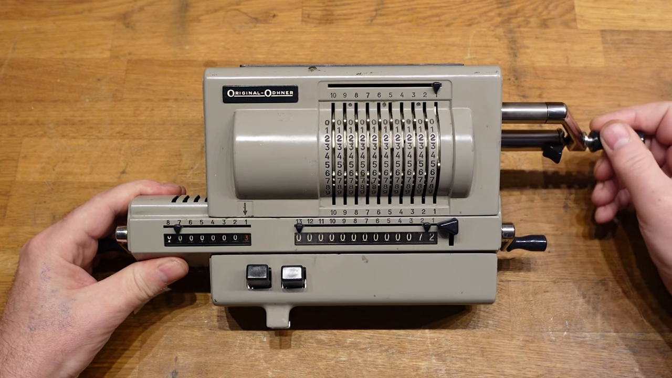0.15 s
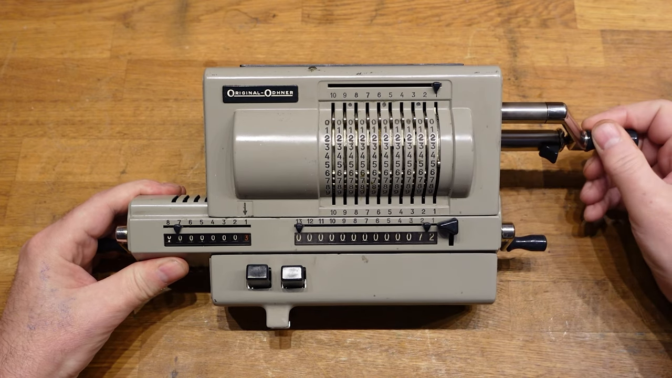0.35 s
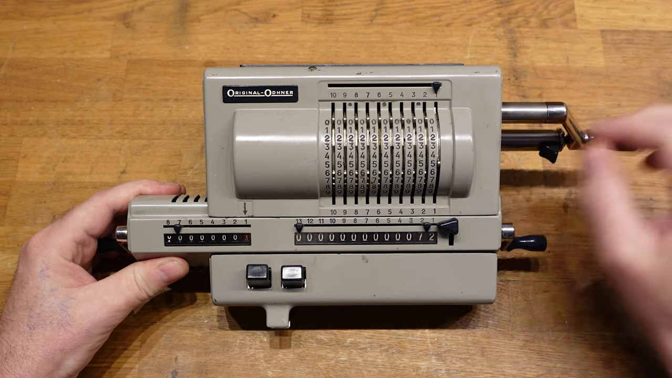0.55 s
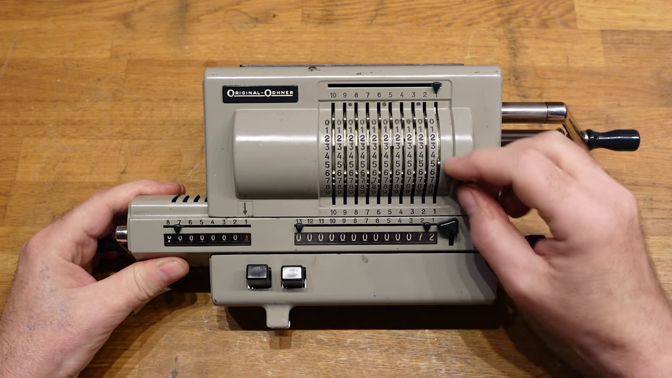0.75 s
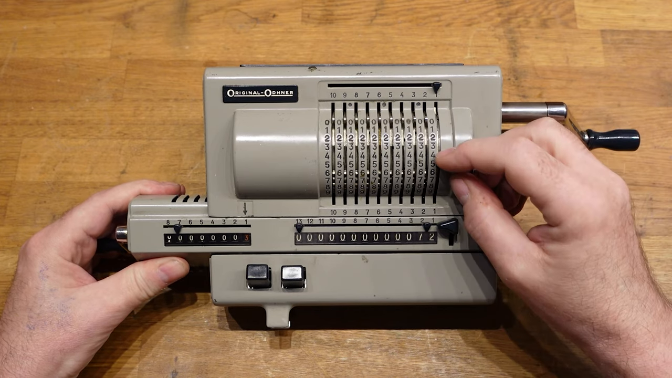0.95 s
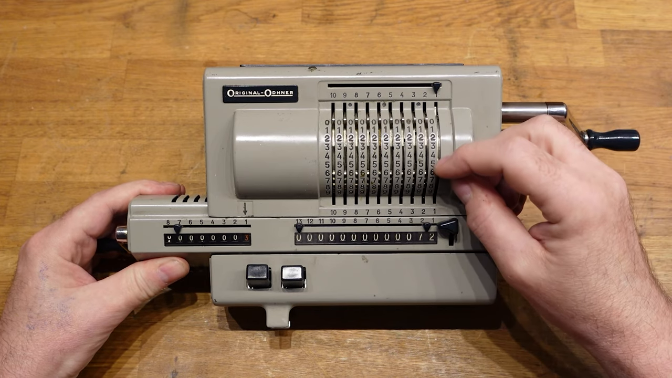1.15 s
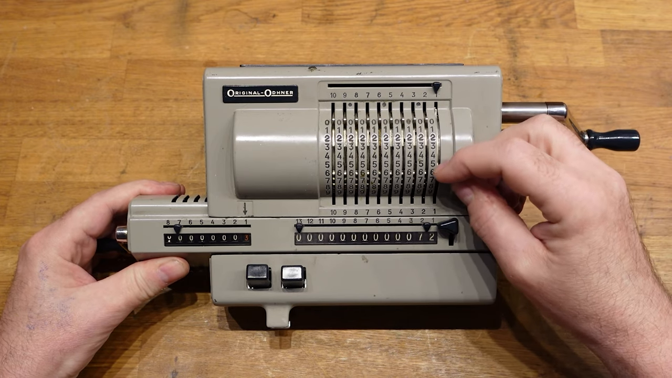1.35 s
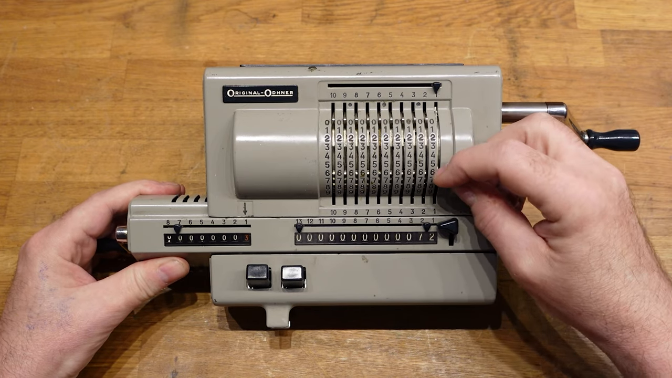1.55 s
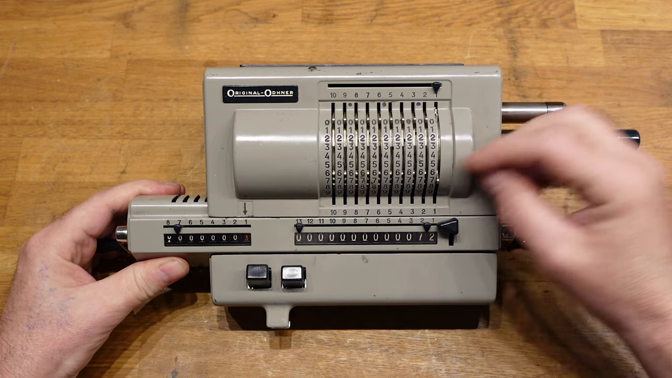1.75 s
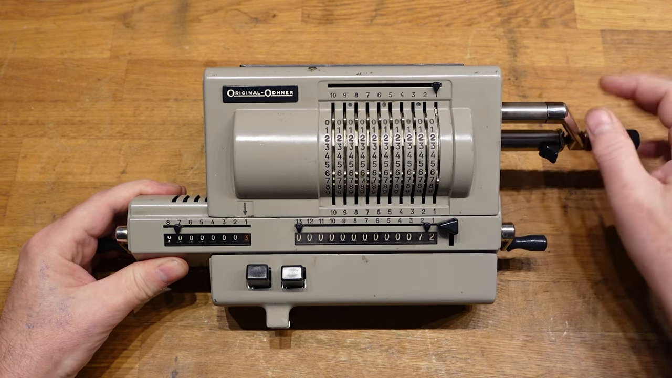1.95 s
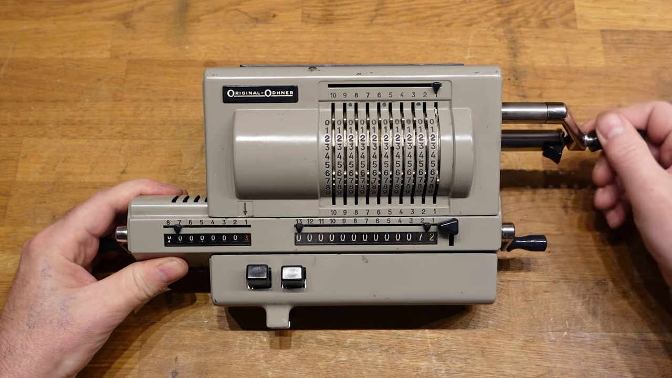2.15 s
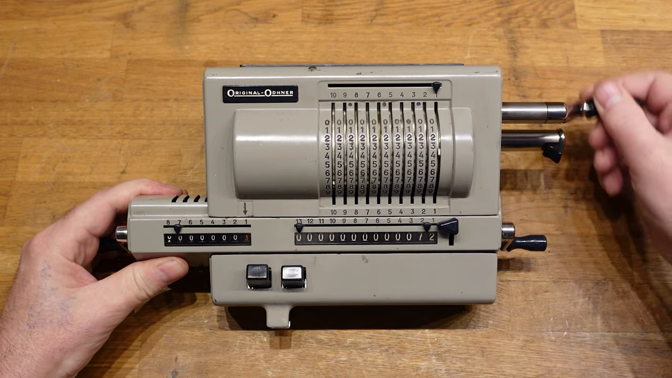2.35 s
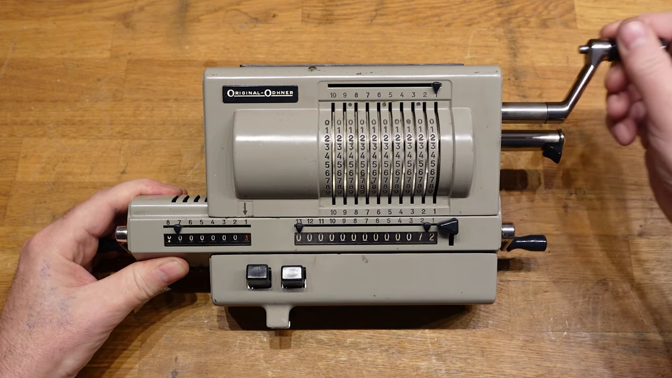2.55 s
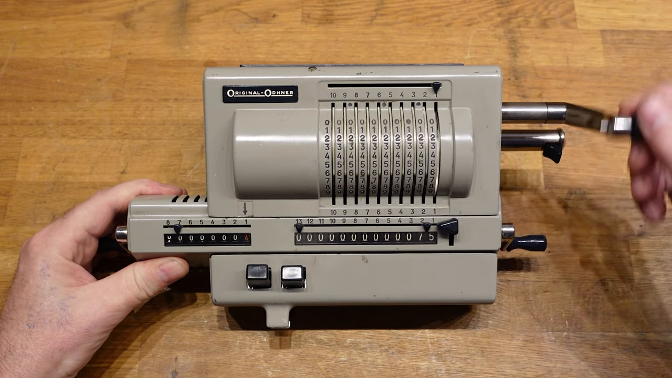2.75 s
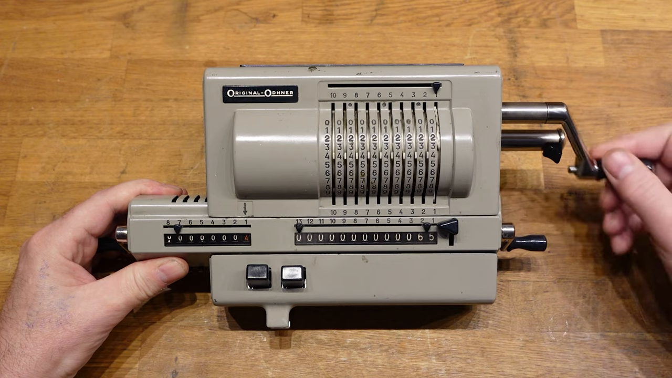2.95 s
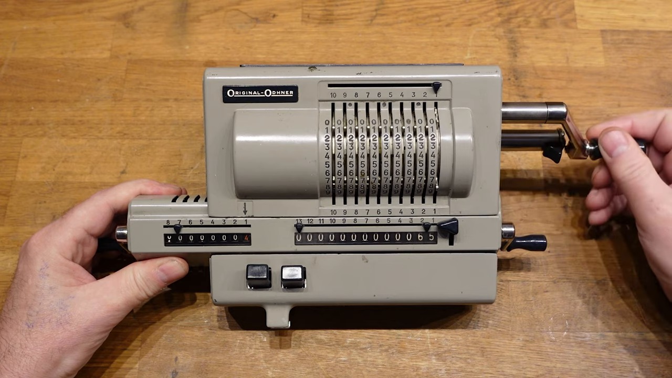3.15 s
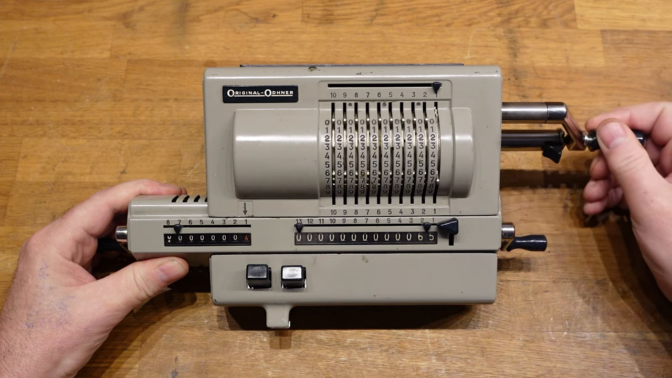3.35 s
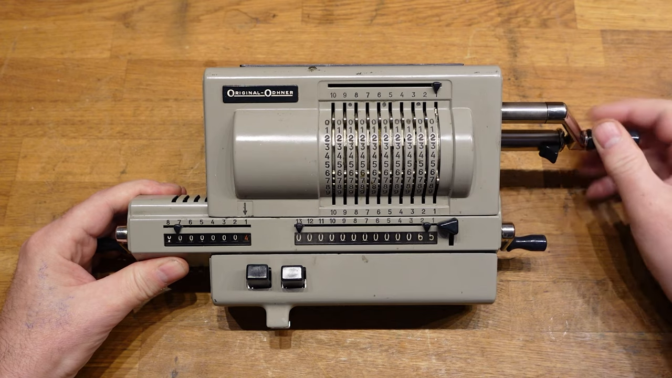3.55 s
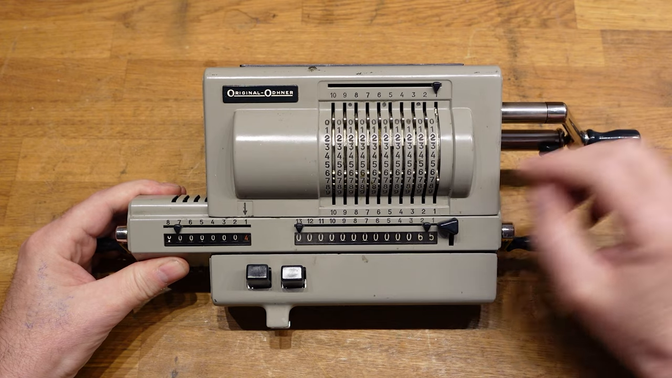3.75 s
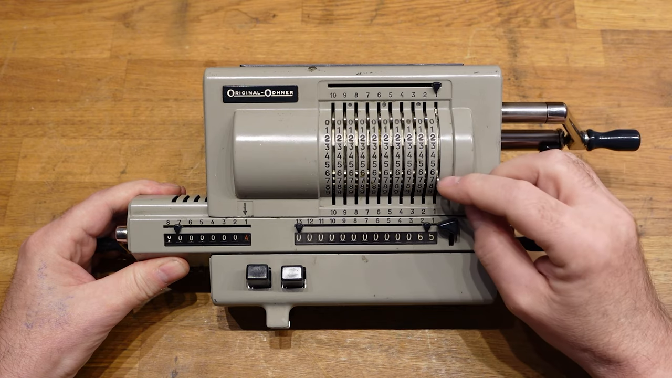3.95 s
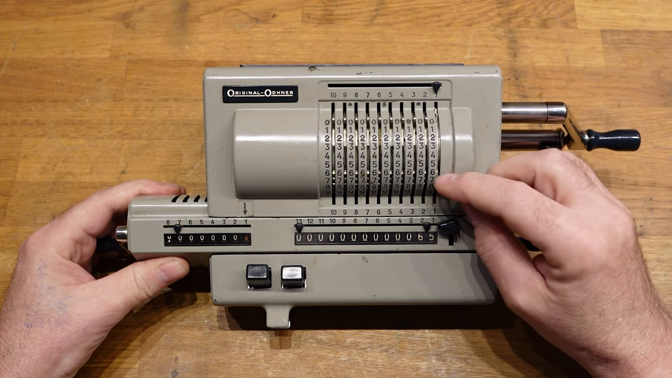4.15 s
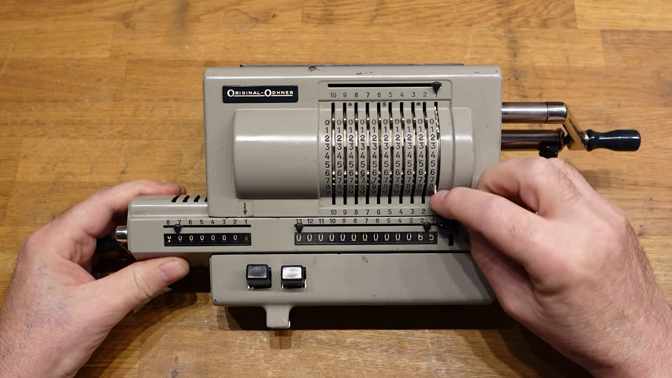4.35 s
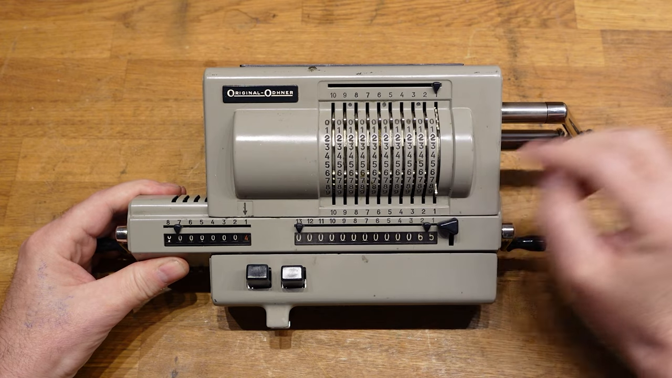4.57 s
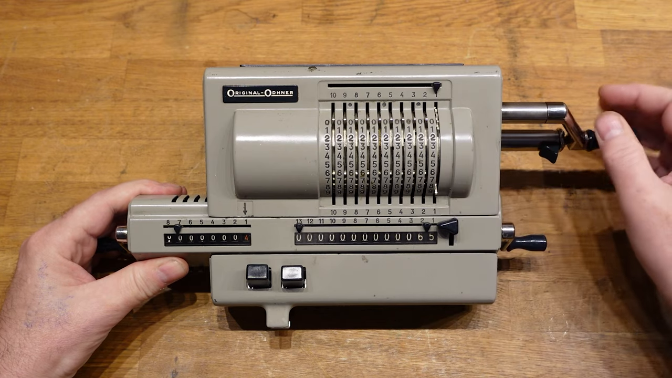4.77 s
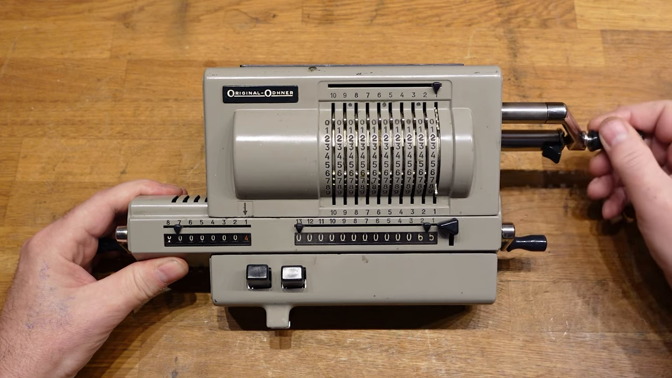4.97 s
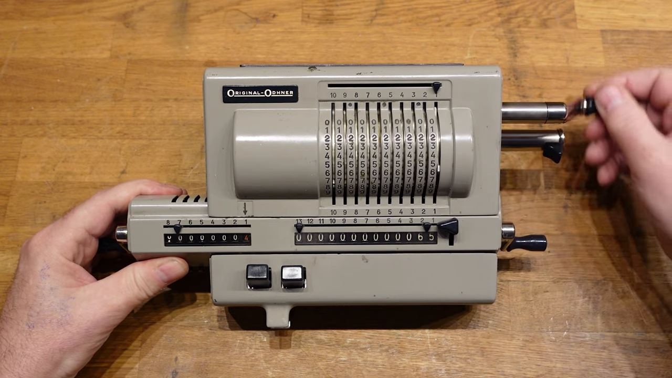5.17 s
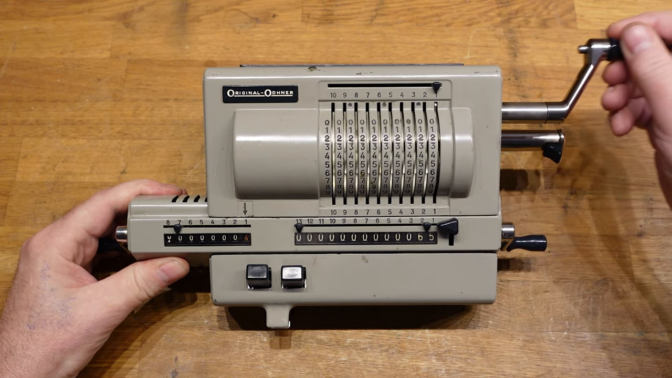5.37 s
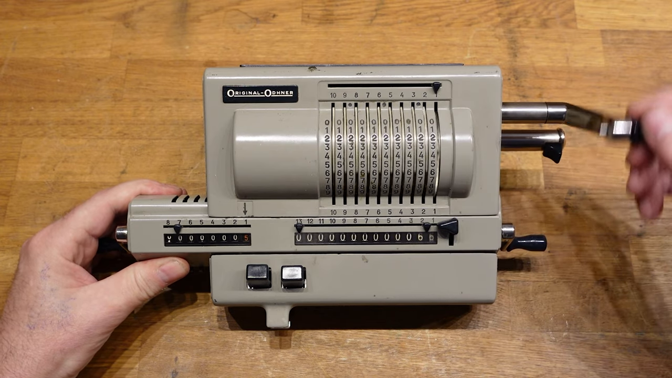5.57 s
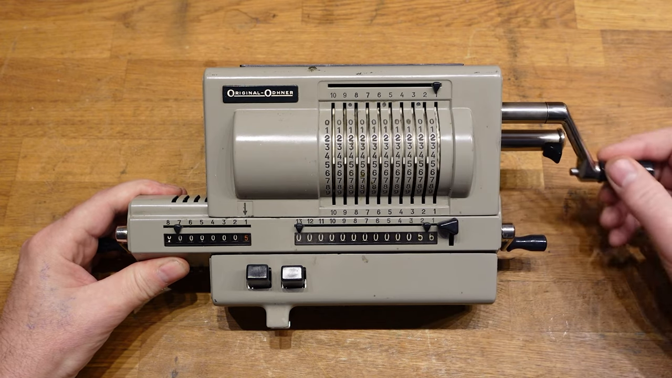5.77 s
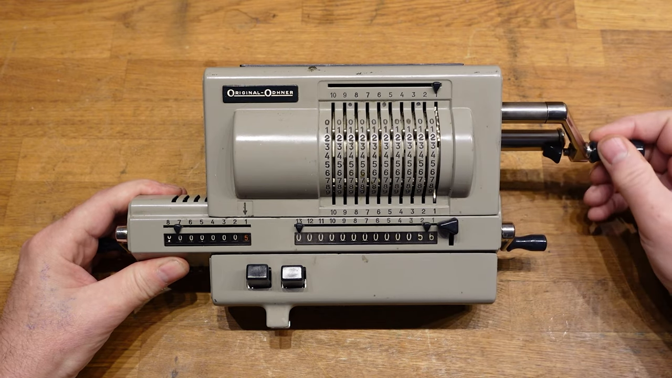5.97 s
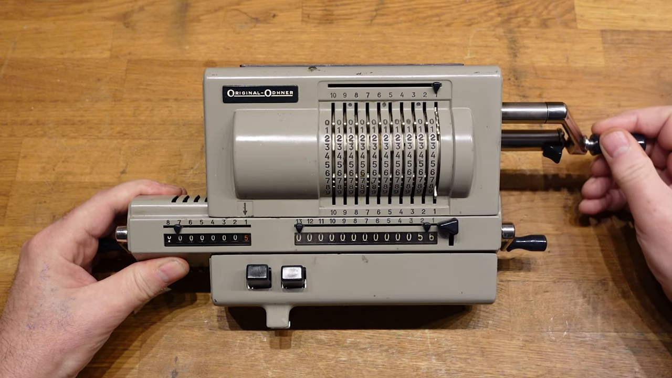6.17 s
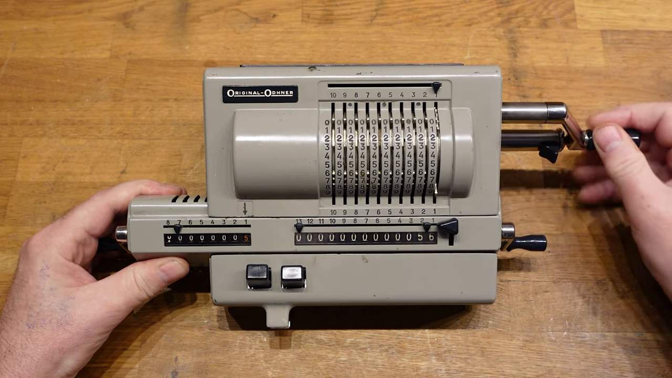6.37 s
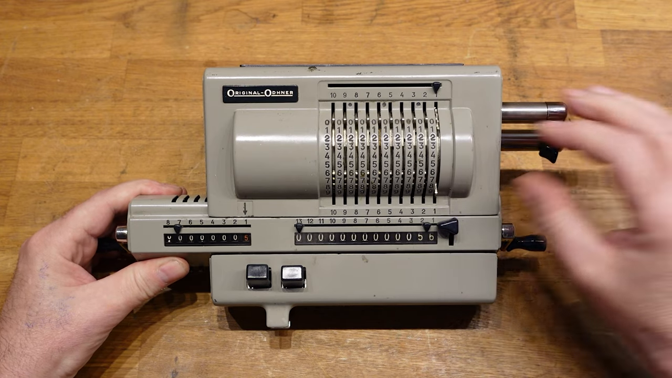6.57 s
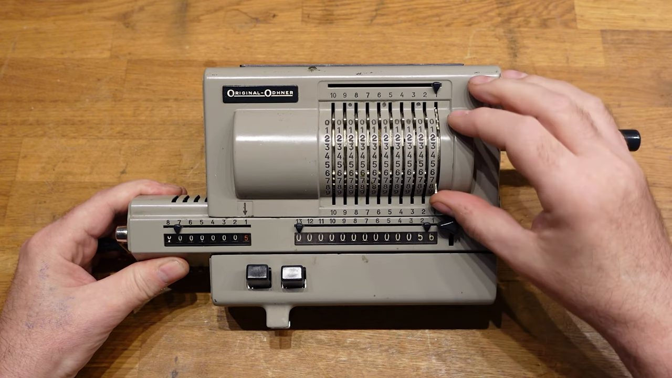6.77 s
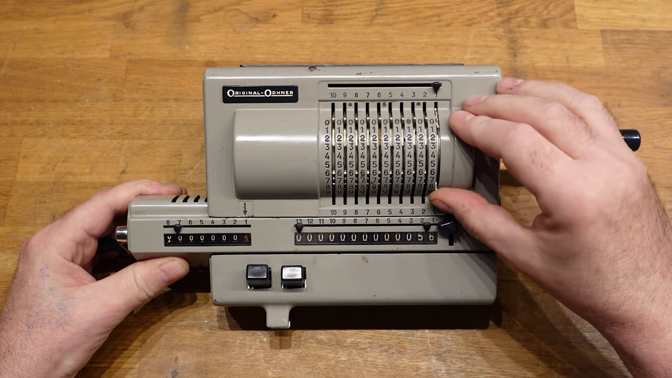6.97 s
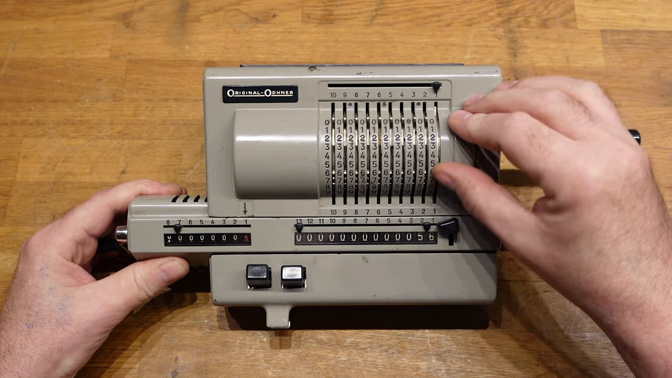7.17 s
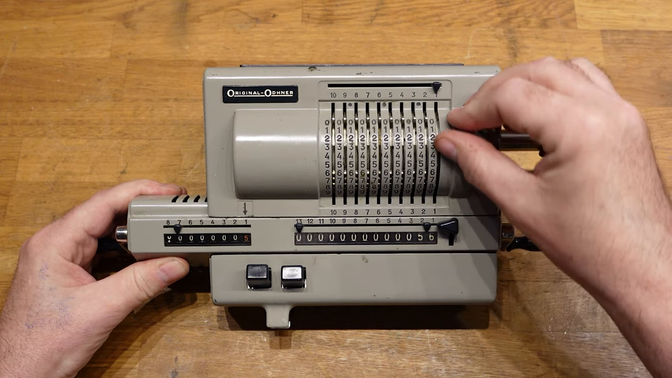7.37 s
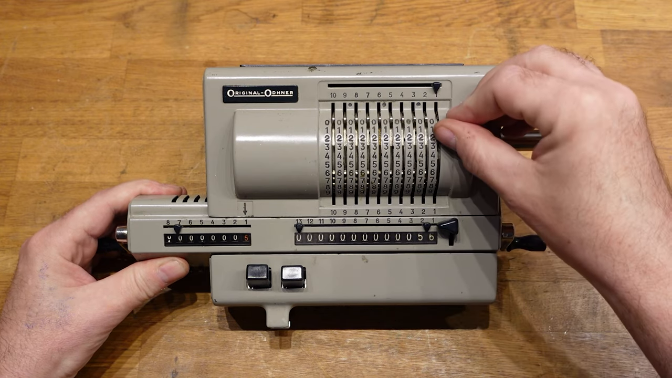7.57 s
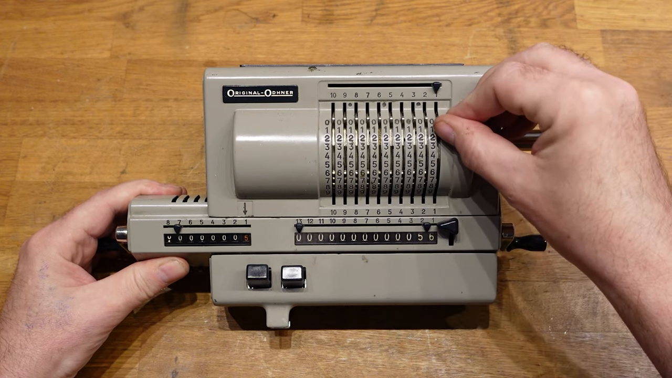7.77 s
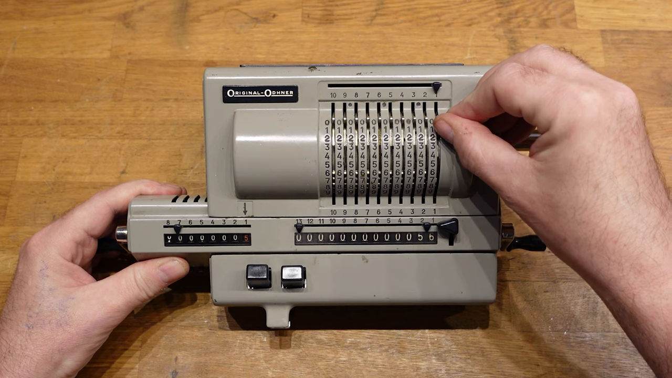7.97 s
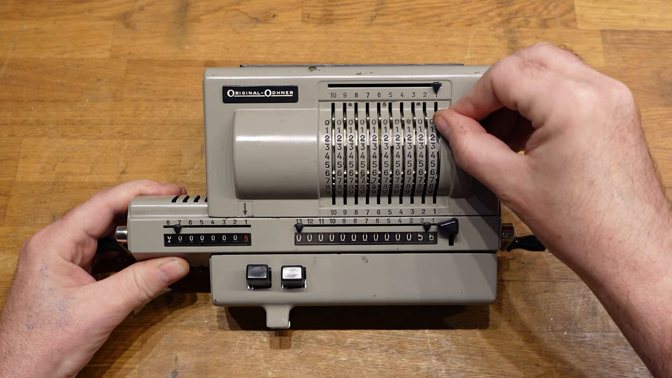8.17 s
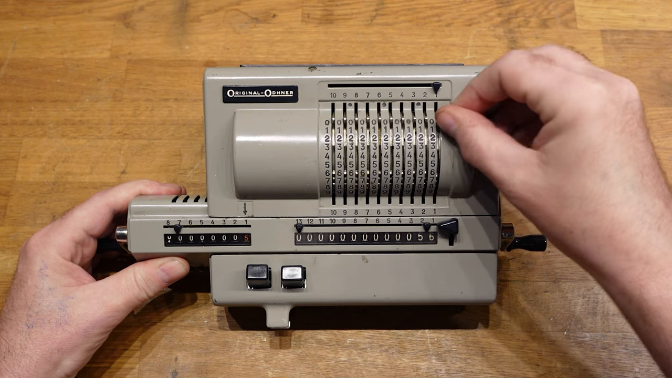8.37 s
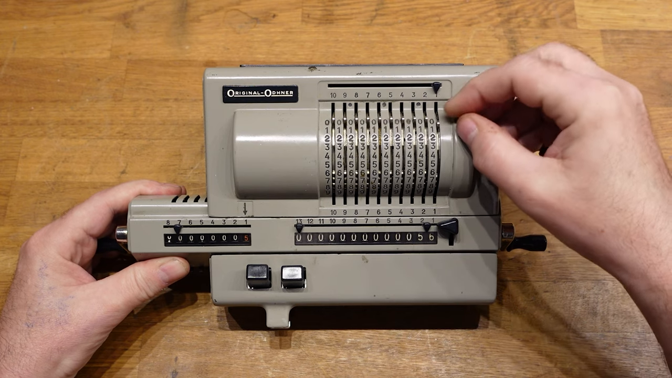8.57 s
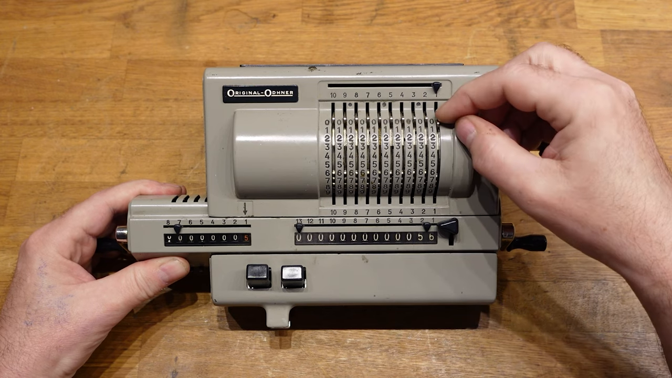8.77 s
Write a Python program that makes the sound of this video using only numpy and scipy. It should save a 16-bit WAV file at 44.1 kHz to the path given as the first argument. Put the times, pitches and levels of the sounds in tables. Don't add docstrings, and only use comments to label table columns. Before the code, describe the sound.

A hand-cranked steel calculator sits on a wooden table, heard closely in a quiet, slightly live room with soft rumble and hiss. In the first half second the handle gives small metallic clicks, the clearest near 0.35. Barely audible lever touches follow at 1.3 and 1.7. A catch snaps at 2.2, dull drum ticks lead in, and from 2.66 to 2.86 pawl teeth rattle in a loud, bright, rapid ratchet, closing with a clack and loose ticks. The handle snaps at 3.15 and knocks around 3.45. Bright lever clicks come at 4.3. After faint handle knocks near 5.05, a second, weightier ratchet runs from 5.48 to 5.67. The catch snaps at 5.97 and the handle clicks at 6.3. Thin lever snaps scatter from 7.1 to 7.6, with tiny spring rings; one faint tick sounds at 8.1, then only light finger rubbing and room hiss remain.

```python
import sys
import numpy as np
from scipy import signal
from scipy.fft import rfft, irfft
from scipy.io import wavfile
from scipy.ndimage import uniform_filter1d

SR = 44100
rng = np.random.default_rng(int(sys.argv[2]) if len(sys.argv) > 2 else 0)


def voltage_ratio(level):
    return 10 ** (np.asarray(level, float) / 20)


def wrap_up_sound(samples):
    columns = np.atleast_2d(samples).T
    tamed = np.clip(columns, -1, 1)
    steps = np.round(tamed * 32767).astype(np.int16)
    wavfile.write(sys.argv[1], SR, steps)


N = 388962
SPAN = 4096

# start in seconds, steel peak in dB.
TEETH = [(2.6605, -21.5), (2.6757, -8), (2.6953, -5.5), (2.7171, -5.5), (2.7388, -6), (2.7588, -3.5),
         (2.7778, -5), (2.7958, -9), (2.8104, -27.5), (5.4846, -22), (5.4868, -22), (5.4997, -7),
         (5.5191, -6.5), (5.5388, -6), (5.5568, -6), (5.5801, -7), (5.5981, -5), (5.6143, -6), (5.6324, -6),
         (5.6493, -9.5)]
# start in seconds, steel peak in dB.
RELEASE = [
    (2.8599, -8),
    (5.6722, -8.5),
]
# start in seconds, steel peak in dB,
# case in dB and frame in dB against the steel.
DRUM = [(2.384, -43, -12.5, -9.5), (2.4206, -49.5, -11, -3.5), (2.448, -32, -9, -9.5),
        (2.4988, -37, -23.5, -12.5), (2.5449, -37.5, -13.5, -13.5), (2.588, -30.5, -28, -16.5),
        (2.608, -26.5, -20.5, -23), (2.6244, -36, -9, -23), (2.6422, -42, -6.5, -2.5),
        (2.9864, -42, -11, 0), (3.021, -42, -16, -1), (3.085, -48.5, 1.5, 3), (5.1922, -47.5, -12, -7),
        (5.2334, -39, -5, -1), (5.2622, -41, -13.5, -17.5), (5.3118, -40, -14, -5.5),
        (5.3589, -39, -11.5, -11.5), (5.4051, -35, -21.5, -12), (5.4273, -28.5, -29, -26.5),
        (5.4468, -35, -7, -7.5), (5.829, -55, -17, 15.5), (5.8586, -44, -15, -1), (5.906, -43, -3.5, 2.5)]
# start in seconds, steel peak in dB,
# case, frame and brightness in dB against the steel.
CATCH = [(0.0723, -28.5, -13, -12, -1), (0.2467, -38.5, -4.5, -3.5, -2), (0.348, -25.5, -28, -14, -14),
         (1.949, -52.5, 1, -5, -3), (2.2237, -21.5, -20, -21, -1.5), (2.2307, -26, -37, -6.5, 1),
         (3.1461, -19.5, -27, -12.5, 1), (3.1652, -28.5, -15.5, -9, 4), (3.4274, -47.5, -7, 9, 1),
         (3.4354, -39, -1.5, 0, -1), (5.9729, -18.5, -35, -22, 0), (5.9883, -33, -4.5, 0.5, 0),
         (6.3533, -33, -24, -11, -0.5)]
# start in seconds, steel peak in dB, case and frame in dB against the steel.
HANDLE = [(0.032, -48, -14, -6), (0.127, -62.5, 14, 15.5), (0.389, -41, -26, -1), (0.5064, -49, -3, -4),
          (2.268, -35.5, -6.5, -9), (3.4185, -36.5, -5, -5), (3.4642, -29.5, -15, -7),
          (3.5807, -49, 2, -4.5), (3.631, -41, -14, -5), (4.7341, -47, -6.5, -0.5),
          (4.8932, -53.5, -6, 0.5), (5.0427, -50, -1, 1), (5.0629, -31, -12.5, -9),
          (6.3003, -37, -13, -4.5), (6.3101, -25.5, -6.5, -9), (6.3288, -37.5, -10, 3),
          (6.3567, -22.5, -33.5, -11)]
# start in seconds, steel peak in dB,
# frame and brightness in dB against the steel.
LEVERS = [(1.294, -56.5, -4, -8), (1.696, -55, -7, -7), (4.3222, -45.5, -23, 5.5), (4.3294, -27.5, -26, 7),
          (4.3385, -43.5, 0.5, 21), (4.359, -28.5, -12, 6.5), (4.3854, -52, 4, -1),
          (4.54, -44.5, -14, -0.5), (7.0974, -41.5, -14, -3), (7.1035, -28, -9, 0.5),
          (7.1272, -33, -7.5, 8.5), (7.184, -29.5, -7.5, 5.5), (7.2597, -34.5, -1, 5.5),
          (7.3114, -31.5, -6, 0), (7.3178, -29.5, -7.5, 2), (7.4294, -40, -5, 1.5),
          (7.5577, -34.5, -7, -0.5), (7.5666, -63, 19, 12.5), (7.5814, -54, -10.5, 6),
          (8.1193, -42, -1, 3.5)]
# start in seconds, steel peak in dB,
# frame and brightness in dB against the steel, scrape in ms.
SLIDES = [(0.314, -49, 3, -16, 26), (2.174, -56.5, 3.5, -4, 24), (2.216, -29, -8, -.7, 6.3),
          (2.6598, -23.5, -5.5, -5, 9), (2.843, -24, -4.5, -3.5, 17), (3.1417, -34, -9, 1, 1.7),
          (4.998, -61, 5, -8, 28), (5.055, -42.5, -12.5, -4, 9.3), (5.8, -59, 6, -6.5, 22),
          (5.92, -55, 7.5, -9, 29), (5.9694, -38, 11, 1.7, 5.2)]
# start in seconds, steel peak in dB,
# frame in dB against the steel, scrape in ms.
NUDGES = [(7.173, -47.5, 3, 1.5), (7.25, -37.5, -5, 9.6), (7.3101, -47, -6, 1.4), (7.41, -48, -8, 7.4)]
# start in seconds, steel peak in dB, brightness in dB against the steel.
RATTLES = [(.342, -54, -2), (.381, -46.5, -3), (2.8434, -24.5, 3), (2.872, -26.5, -3.5), (2.885, -34, -8),
           (2.973, -43, -9.5), (5.5926, -15, 8), (5.685, -26, -3), (5.702, -32, -6.5), (7.415, -57, -9)]
# start in seconds, case peak in dB, frame in dB against the case.
TOUCHES = [(0.311, -44, -6), (1.108, -57, -16), (2.151, -42.5, -21), (2.184, -42.5, -15), (2.569, -33, -18),
           (3.3, -45, 0.5), (3.585, -48, -18), (4.292, -49, -4), (4.532, -54, -3), (4.948, -42.5, -6.5),
           (5.385, -38, -12), (5.439, -34, -11), (5.997, -45, 14), (6.013, -33, -28.5), (6.975, -45, -2),
           (7.11, -50, -3), (7.19, -31.5, -11), (7.32, -37, -28), (1.957, -49, -20), (5.07, -54, -15)]
# start in seconds, peak in dB.
THUMPS = [(0.005, -58), (0.08, -51.5), (0.253, -55), (2.549, -56), (5.061, -61), (5.419, -51.5),
          (2.223, -58), (2.7, -44), (2.759, -45), (3.15, -58), (3.459, -57), (4.33, -55.5), (5.534, -45),
          (5.619, -43.5), (6.018, -49.5), (6.068, -68), (6.337, -55)]
# start in seconds, frequency in Hz, level in dB, t60 in seconds.
SINGING = [(.349, 575, -40, 0.14), (2.45, 1000, -43.5, 0.072), (2.863, 1800, -26, 0.028),
           (3.466, 7010, -60, 0.12), (4.333, 9530, -38, 0.2), (4.331, 4400, -63, 0.15),
           (4.36, 1837, -52.5, 0.22), (5.236, 1200, -49, 0.06), (5.56, 520, -41, .2), (5.63, 660, -41, .15),
           (2.72, 458, -43, .15), (.349, 12400, -52, 0.13), (.349, 15150, -53, .12),
           (.381, 8300, -57, .012), (7.43, 6650, -54, 0.037), (7.105, 4020, -47, 0.11),
           (7.108, 1450, -49.5, 0.094), (7.26, 1400, -46, .07), (7.26, 1130, -45, 0.079),
           (7.318, 6750, -43.5, .04), (7.318, 1100, -44, .07), (7.56, 4000, -48.5, 0.054),
           (2.16, 1400, -60, .12), (2.845, 1700, -32.5, .08), (5.62, 1700, -30.5, .08),
           (6.353, 6210, -34, 0.11), (6.354, 566, -36, 0.18), (7.107, 9570, -48, .2),
           (7.127, 14100, -41, .15), (7.184, 4070, -46.5, 0.064), (7.312, 10500, -39.5, 0.05),
           (7.556, 3800, -59.5, 0.094), (8.121, 1732, -57.5, 0.37), (8.119, 7440, -63.5, 0.2),
           (8.121, 4230, -57, 0.059), (5.063, 590, -44, 0.069), (7.562, 1400, -52, 0.047),
           (7.415, 1610, -53, .04), (4.336, 1500, -45, 0.056), (4.335, 720, -58, 0.092),
           (6.2, 1230, -57, 0.04)]
# peak in seconds, level in dB.
TREBLE_SWELLS = [(.15, -64), (.32, -69), (3.1, -72), (5.0, -72), (5.15, -69.5), (5.3, -72), (5.9, -71.5),
                 (7.6, -68.5), (8.6, -69), (8.8, -68.5)]
# strongest push in seconds, rumble in dB.
RUMBLE = [(0.05, -68), (.3, -77), (2.25, -68), (2.75, -63.5), (3.45, -71), (4.35, -79), (5.6, -74),
          (6.05, -62), (6.35, -80), (6.95, -72)]

# frequency in Hz, height over the bare click in dB, t60 in seconds.
GEAR_MODES = [(3090, 6.9, 0.0086), (3510, 0.9, 0.036), (4210, 5, 0.032), (4550, 3.8, 0.0062),
              (5110, 5, 0.019), (5763, 5, 0.011), (7000, 7.9, 0.0046), (7980, 6, 0.0031),
              (9750, 2.8, 0.0086), (12740, 1.3, 0.015), (15000, 3, 0.013)]
ROTOR_MODES = [(2730, 6.3, 0.011), (3320, 2.7, 0.0045), (3680, 7, 0.0062), (4660, 5, 0.033),
               (5200, 3, 0.013), (6300, 1.5, 0.0098), (6960, 3, 0.0085)]
CRANK_MODES = [(2762, 4, 0.0052), (3590, 21, 0.02), (3870, 4.3, 0.03), (4550, 0.61, 0.0081),
               (6210, 7, 0.0043), (6830, 21, .015), (8100, 0.61, 0.036), (9700, 0.91, 0.02),
               (10700, 1.9, 0.035), (12100, 4.3, 0.036)]
LEVER_MODES = [(4070, 11, 0.0072), (6530, 13, 0.0077), (6430, 21, 0.0072), (7340, 0.66, 0.045),
               (9450, 7.4, 0.0052), (10600, 11, 0.017), (12680, 1.7, 0.036), (13300, 1.5, 0.036),
               (13900, 2.3, 0.045)]
FRAME_MODES = [(1170, 5.2, 0.06), (1349, 1.1, 0.0033), (1500, 32, 0.021), (1629, 24, 0.013),
               (1835, 1.8, 0.06), (2080, 5.4, 0.037)]
COVER_MODES = [(1110, 15, .03), (1544, 19, 0.06), (1756, 9, .03), (1876, 11, .025), (2130, 1.3, 0.045),
               (2640, 0.9, 0.045)]
CASE_MODES = [(386.6, 2, .02), (460, 6, 0.05), (576.7, 26, .045), (627, 21, 0.084), (670, 3.8, 0.0076)]
TABLE_MODES = [(184, 2, 0.05), (217.1, 4.5, 0.03), (252.6, 5.5, 0.02)]

# delay in ms, level in dB, samples later on the right.
ECHOES = [(.9, -25.5, 0.39), (2.1, -16.5, -0.64), (3.9, -13.5, 0), (6.5, -24.5, -1), (11., -11.5, 1)]
# frequency in Hz, t60 in seconds.
ROOM = [(150, 0.8), (600, 0.39), (2000, 0.54), (5000, 0.4), (10000, 0.4), (16000, 0.36)]
# frequency in Hz, level in dB.
WIDTH = [(100, -7.5), (300, -14.5), (2200, -11), (4500, -6), (12000, -8.5)]
# frequency in Hz, density in dB per Hz.
AIR = [(15, -59.5), (25, -37.5), (177, -1.5), (252, -1.5), (321, -2.5), (358, -3.5), (457, -7.5),
       (952, -11), (1510, -9), (1680, -13.5), (4480, -20), (14800, -27), (16500, -26)]
# frequency in Hz, likeness from 0 to 1.
AIR_SAME = [(60, 0.75), (240, 0.83), (950, 0.21), (3770, 0.16), (15000, 0.31)]


def placed(starts_s, sounds):
    track = np.zeros(N)
    for start_s, sound in zip(starts_s, sounds):
        part = track[round(start_s * SR):][:len(sound)]
        part += sound[:len(part)]
    return track


def read(points, hz):
    f, value = np.transpose(points)
    return np.interp(np.log(hz + 1), np.log(f + 1), value)


def contact(chatter_ms, chatter_db, per_s):
    burst_db, burst_ms = -12, 1.2
    ms = 1000 * np.arange(SPAN) / SR
    age = ms / np.clip(chatter_ms, 0.3, 25)[:, None]
    size, chance = np.moveaxis(rng.random((len(chatter_ms), SPAN, 2)), -1, 0)
    rebounds = 4.74 * (size - 0.5) * (chance < per_s / SR)
    lingering = voltage_ratio(chatter_db) * np.exp(-age)
    quick = voltage_ratio(burst_db) * np.exp(-ms / burst_ms)
    sharp = rebounds * (lingering + quick)
    sharp[:, 0] = 1
    swell = rebounds * age * np.exp(-1.6 * age)
    return rfft(sharp), rfft(swell)


def ring(force, modes, lo_hz, hi_hz, vary_db, bare=0.98):
    detune = 0.012
    hz = np.fft.rfftfreq(SPAN, 1 / SR)
    f, db, t60_s = np.transpose(modes)[:, :, None]
    spot, shift = np.moveaxis(rng.standard_normal((len(force), len(modes), 1, 2)), -1, 0)
    t60_s = np.clip(t60_s, 0.002, 0.004 + 28 / f)
    half_width_hz = np.log(1000) / (2 * np.pi * t60_s)
    db = np.minimum(db, 7500 / f - f / 3000)
    height = voltage_ratio(db + vary_db * spot) * half_width_hz
    humps = height / (half_width_hz + 1j * (hz - f * (1 + detune * shift)))
    body = bare + humps.sum(axis=1)
    edges = signal.butter(3, [lo_hz, hi_hz], "band", fs=SR, output="sos")
    sound = irfft(force * body * signal.sosfreqz(edges, hz, fs=SR)[1])
    return sound / abs(sound).max(axis=1, keepdims=True)


def blows(s, db, case_db, frame_db, bright_db, chatter_ms, steel, chatter_db, per_s, top_hz,
          lo_hz=2800, soft=False, frame=FRAME_MODES):
    levels_db = (db, case_db, frame_db, bright_db)
    db, case_db, frame_db, bright_db = (np.reshape(v + 0 * s, (-1, 1)) for v in levels_db)
    sharp, swell = contact(chatter_ms + 0 * s, chatter_db, per_s)
    force = swell if soft else sharp
    sound = ring(force, steel, lo_hz, top_hz, vary_db=1.5)
    sound += voltage_ratio(bright_db) * ring(force, steel, top_hz, 20000, vary_db=1.5)
    sound += voltage_ratio(frame_db) * ring(swell + 0.22 * force, frame, 900, 2535, vary_db=3)
    sound += voltage_ratio(case_db) * ring(swell + 0.19 * force, CASE_MODES, 376.4, 720, vary_db=3, bare=0.23)
    return placed(s + 0.0005, voltage_ratio(db) * sound)


def gearing():
    second_turn_s, load_db_per_s = 5.48, 18
    bounce_ms, bounce_db = 0.8, -5
    s, db = np.transpose(TEETH)
    frame_db = -17.5 + load_db_per_s * np.maximum(s - second_turn_s, 0)
    teeth = blows(s, db, case_db=-21, frame_db=frame_db, bright_db=-5, chatter_ms=9.6, steel=GEAR_MODES,
                  chatter_db=-18.5, per_s=9000, top_hz=9200)
    second_landing = voltage_ratio(bounce_db) * np.roll(teeth, round(bounce_ms * SR / 1000))
    teeth = (teeth + second_landing) * voltage_ratio(-0.5)
    release = blows(*np.transpose(RELEASE), case_db=-32.5, frame_db=-22, bright_db=0.6, chatter_ms=2.6,
                    steel=GEAR_MODES, chatter_db=-16.5, per_s=12000, top_hz=8900)
    drum = blows(*np.transpose(DRUM), bright_db=-25, chatter_ms=7.2, steel=ROTOR_MODES,
                 chatter_db=-11.5, per_s=24000, top_hz=6600)
    return teeth + release + drum


def handle():
    catch = blows(*np.transpose(CATCH), chatter_ms=7.3, steel=CRANK_MODES,
                  chatter_db=-1.5, per_s=7700, top_hz=8600)
    axle = blows(*np.transpose(HANDLE), bright_db=-9.5, chatter_ms=5.7, steel=CRANK_MODES,
                 chatter_db=-10, per_s=6500, top_hz=7944)
    return catch + axle


def levers():
    s, db, frame_db, bright_db = np.transpose(LEVERS)
    return blows(s, db, case_db=-16.5, frame_db=frame_db, bright_db=bright_db, chatter_ms=5.4, steel=LEVER_MODES,
                 chatter_db=-9, per_s=6200, top_hz=9570, lo_hz=3830, frame=COVER_MODES)


def slides():
    s, db, frame_db, bright_db, scrape_ms = np.transpose(SLIDES)
    crank = blows(s, db, case_db=-12, frame_db=frame_db, bright_db=bright_db, chatter_ms=scrape_ms,
                  steel=CRANK_MODES, chatter_db=0, per_s=8800, top_hz=8900, soft=True)
    s, db, frame_db, scrape_ms = np.transpose(NUDGES)
    lever = blows(s, db, case_db=-4.5, frame_db=frame_db, bright_db=5.5, chatter_ms=scrape_ms, steel=LEVER_MODES,
                  chatter_db=0, per_s=5700, top_hz=9100, lo_hz=3700, soft=True, frame=COVER_MODES)
    return crank + lever


def rattles():
    s, db, bright_db = np.transpose(RATTLES)
    return blows(s, db, case_db=-32.5, frame_db=-10.5, bright_db=bright_db, chatter_ms=1.3, steel=GEAR_MODES,
                 chatter_db=-11, per_s=9000, top_hz=9300, lo_hz=5000)


def touches():
    s, db, frame_db = np.transpose(TOUCHES)[:, :, None]
    force = contact(np.full(len(s), 4.6), chatter_db=4.5, per_s=2900)[1]
    sound = ring(force, CASE_MODES, 420, 700, vary_db=1.5, bare=0.23)
    sound += voltage_ratio(frame_db) * ring(force, FRAME_MODES, 1000, 3700, vary_db=3)
    return placed(s[:, 0], voltage_ratio(db - 4) * sound)


def table():
    s, db = np.transpose(THUMPS)
    force = contact(np.full(len(s), 24.0), chatter_db=4.5, per_s=6100)[1]
    return placed(s, voltage_ratio(db[:, None] + 2.5) * ring(force, TABLE_MODES, 120, 270, vary_db=3))


def singing():
    t = np.arange(4 * SPAN) / SR
    attack = np.minimum(t / 0.00045, 1)
    starts_s, tones = [], []
    for (s, hz, db, t60_s), off in zip(SINGING, rng.standard_normal((len(SINGING), 3, 1))):
        beside_hz = hz + off * (10 + 0.012 * hz)
        cluster = np.sin(2 * np.pi * hz * t) + 0.39 * np.sin(2 * np.pi * beside_hz * t).sum(axis=0)
        starts_s.append(s)
        tones.append(voltage_ratio(db - 60 * t / t60_s) * cluster * attack)
    return placed(starts_s, tones)


def room(x):
    turns_per_s = 110
    near = np.zeros((2, 1024))
    near[:, 0] = 1
    for ms, db, lag in ECHOES:
        at = round(ms * SR / 1000) + np.array([0, round(lag)])
        near[[0, 1], at] += voltage_ratio(db)
    out = signal.oaconvolve(x[None], near, axes=1)[:, :N]
    bass = signal.sosfiltfilt(signal.butter(2, 1300, fs=SR, output="sos"), x)
    for k in range(3):
        turn = turns_per_s * np.arange(N) / SR + k / 3
        share = np.sqrt(2 / 3) * np.cos(2 * np.pi * turn)
        feed = voltage_ratio(-8) * share * (x - bass)
        if k == 0:
            feed += voltage_ratio(-6) * bass
        out = out + signal.fftconvolve(feed[None], tail(), axes=1)[:, :N]
    return out


def tail():
    soak_db_per_khz = 0.62
    taps = np.zeros((2, SR // 2 + 2 * SPAN))
    at = np.arange(200, taps.shape[1] - 20, 20)
    at = at + rng.integers(0, 20, (2, len(at)))
    np.put_along_axis(taps, at, rng.choice([-1.0, 1.0], at.shape), 1)
    hz, t, (mid, side) = signal.stft(taps, SR, nperseg=256)
    hz = hz[:, None]
    side = side * voltage_ratio(read(WIDTH, hz))
    decay = voltage_ratio(-60 * t / read(ROOM, hz) - soak_db_per_khz * hz / 1000)
    both = signal.istft(np.array([mid + side, mid - side]) * decay, SR, nperseg=256)[1]
    both = both * np.minimum(np.linspace(4, 0, both.shape[1]), 1)
    return both / np.linalg.norm(both[0])


def swells(rows, rise_db_per_s, fall_db_per_s):
    s, db = np.transpose(rows)[:, :, None]
    late_s = np.arange(N) / SR - s
    slope_db = np.minimum(rise_db_per_s * late_s, -fall_db_per_s * late_s)
    return voltage_ratio((db + slope_db).max(axis=0))


def treble_hiss():
    treble = signal.butter(2, 3500, "high", fs=SR, output="sos")
    a, b = signal.sosfilt(treble, rng.standard_normal((2, N)))
    return swells(TREBLE_SWELLS, 68, 68) * np.array([a + 0.4 * b, a - 0.4 * b])


def rumble():
    band = signal.butter(3, [30, 130], "band", fs=SR, output="sos")
    a, b = signal.sosfilt(band, rng.standard_normal((2, N)))
    level = swells(RUMBLE, rise_db_per_s=123, fall_db_per_s=96) * voltage_ratio(-4)
    return level * np.array([a + 0.4 * b, a - 0.4 * b]) / a.std()


def air():
    level_db, wander_db = -63.5, 2.3
    frames, hz = N // 256 + 5, np.fft.rfftfreq(1024, 1 / SR)[:, None]
    a, b, c, d, patches = rng.standard_normal((frames, 513, 5)).T
    patches = uniform_filter1d(uniform_filter1d(patches, size=6, axis=0), size=14, axis=1)
    patchy_db = wander_db * patches / patches.std() / (1 + hz / 1200)
    same, left = read(AIR_SAME, hz), a + 1j * b
    right = same * left + np.sqrt(1 - same ** 2) * (c + 1j * d)
    z = np.array([left, right]) * voltage_ratio(read(AIR, hz) + patchy_db)
    x = signal.istft(z, nperseg=1024, noverlap=768)[1][:, :N]
    x = signal.sosfilt(signal.butter(2, 90, "high", fs=SR, output="sos"), x)
    return voltage_ratio(level_db) * x / x.std()


def ducking(x):
    knee_db, share, recover_db_per_s = -16.5, 0.2, 25
    power_db = 10 * np.log10(abs(uniform_filter1d(x ** 2, size=2000)) + 1e-12)
    rise_db = np.arange(N) * recover_db_per_s / SR
    cut_db = share * np.maximum(power_db - knee_db, 0)
    held_db = np.maximum.accumulate(cut_db + rise_db) - rise_db
    return voltage_ratio(-uniform_filter1d(held_db, size=400))


def scene():
    singing_dry = 0.6
    sung = singing()
    machine = gearing() + handle() + levers() + slides() + rattles() + touches() + table()
    machine = machine + (1 - singing_dry) * sung
    close = room(machine) + singing_dry * sung
    balance_db = [[-0.2], [0.2]]
    return close * voltage_ratio(balance_db) + rumble() + air() * ducking(machine) + treble_hiss()


def below(x, edge_hz):
    return signal.oaconvolve(x, signal.firwin(1023, edge_hz, window=("kaiser", 9), fs=SR)[None], "same")


def top_cut(x):
    return signal.sosfilt(signal.butter(12, 16980, fs=SR, output="sos"), x)


def record(dry):
    edge_hz, top_hz, above_edge_db = 15850, 16750, -20
    under = below(dry, edge_hz)
    trace = voltage_ratio(above_edge_db) * (below(dry, top_hz) - under)
    return top_cut(under + trace)


dry = scene()
out = record(dry)
wrap_up_sound(out)
```